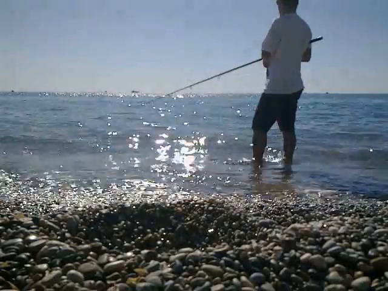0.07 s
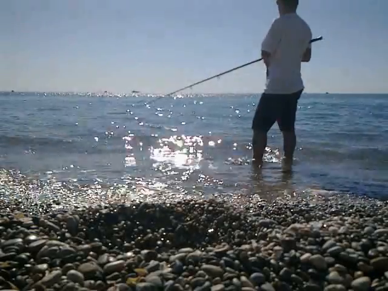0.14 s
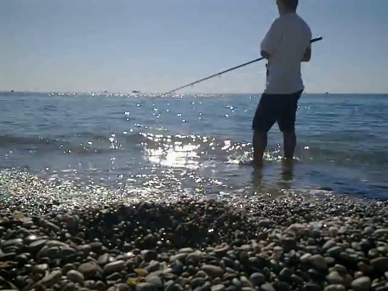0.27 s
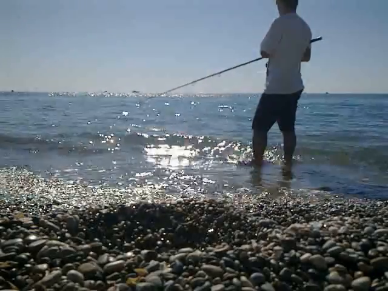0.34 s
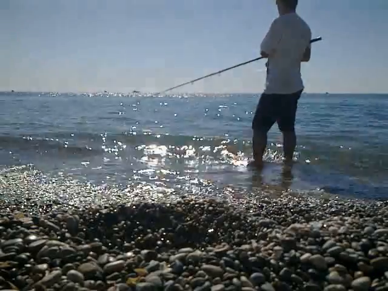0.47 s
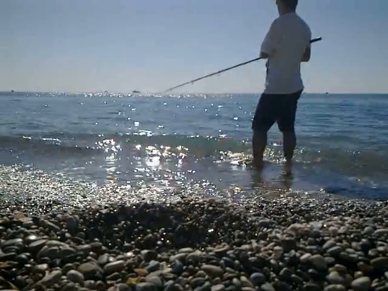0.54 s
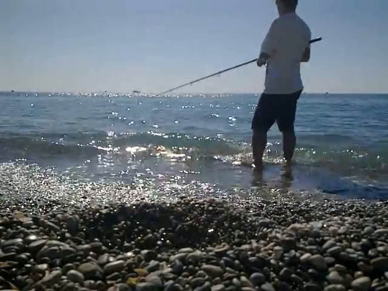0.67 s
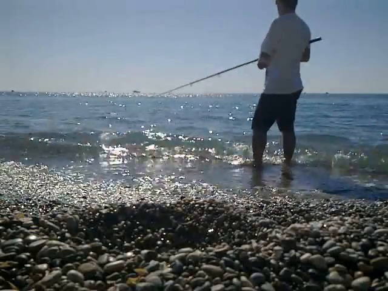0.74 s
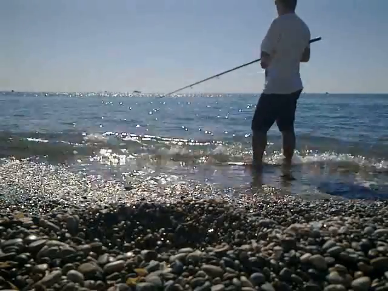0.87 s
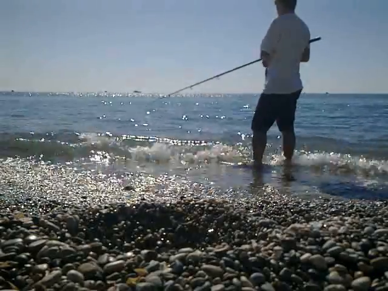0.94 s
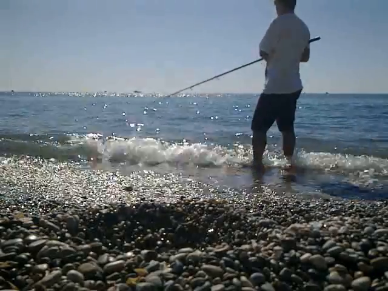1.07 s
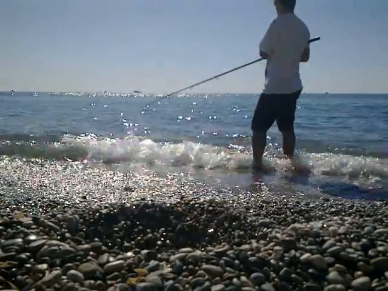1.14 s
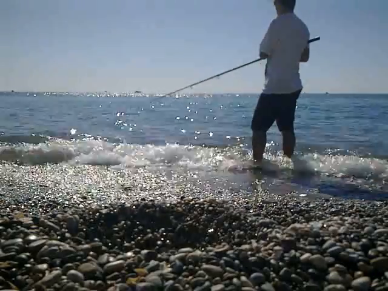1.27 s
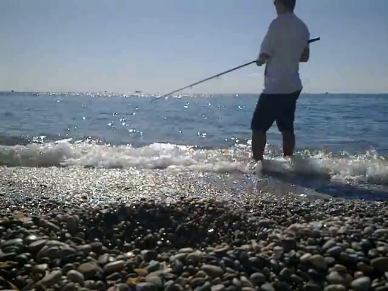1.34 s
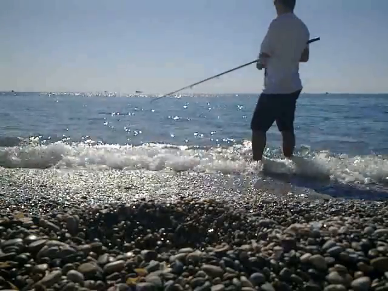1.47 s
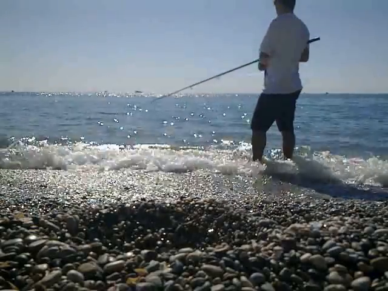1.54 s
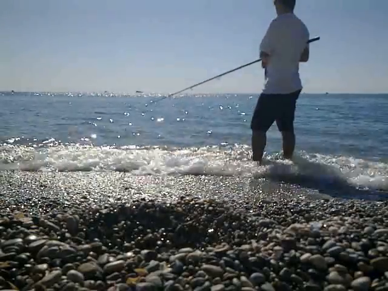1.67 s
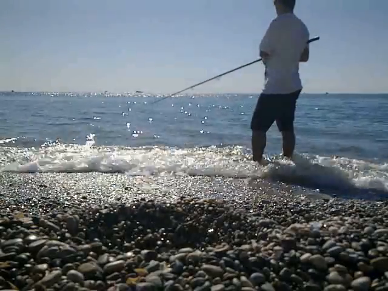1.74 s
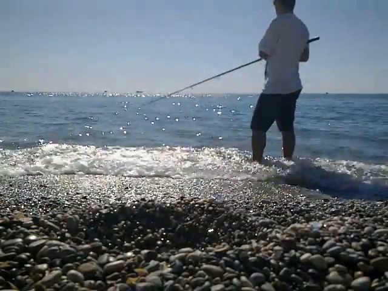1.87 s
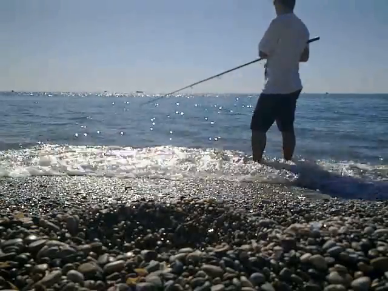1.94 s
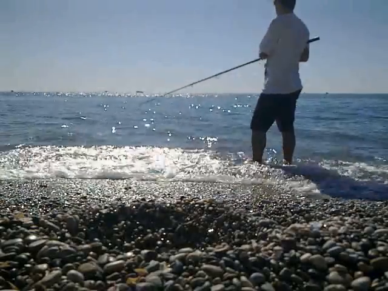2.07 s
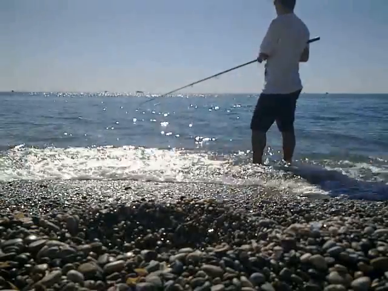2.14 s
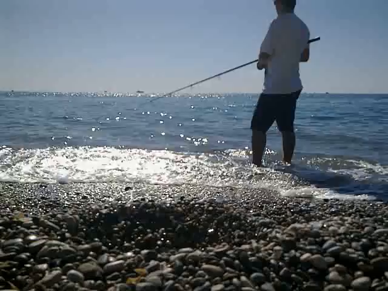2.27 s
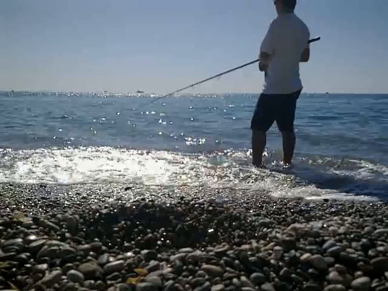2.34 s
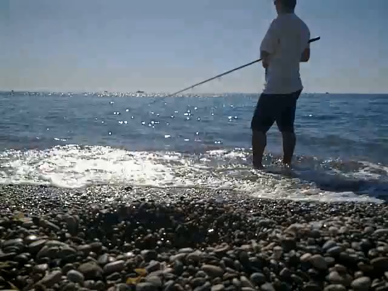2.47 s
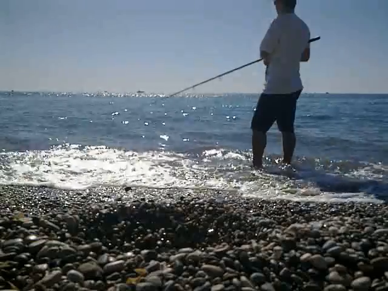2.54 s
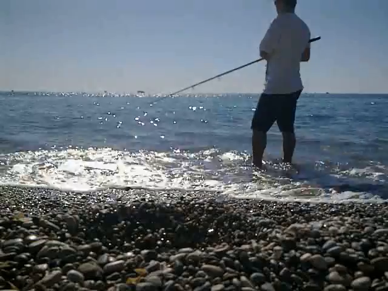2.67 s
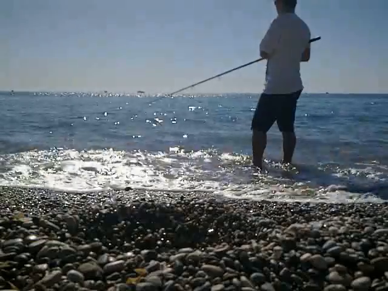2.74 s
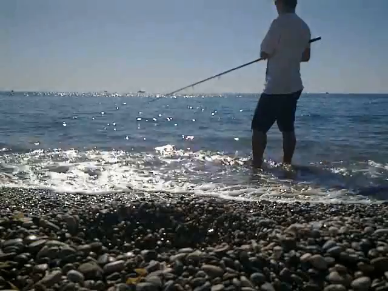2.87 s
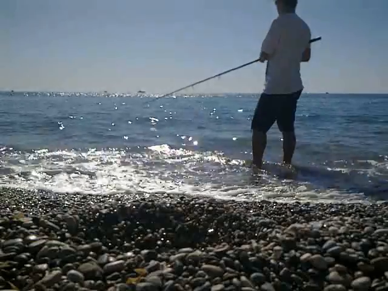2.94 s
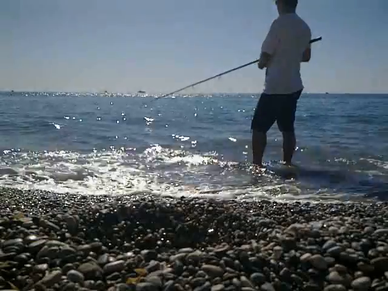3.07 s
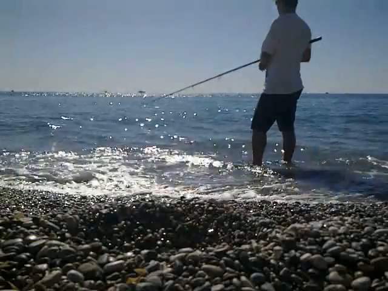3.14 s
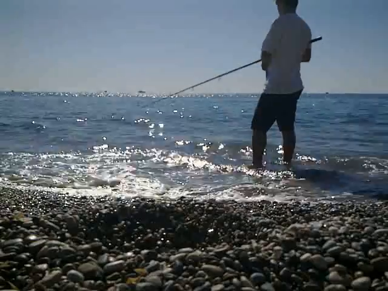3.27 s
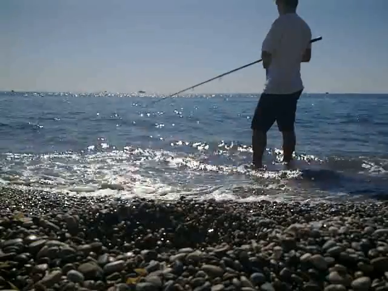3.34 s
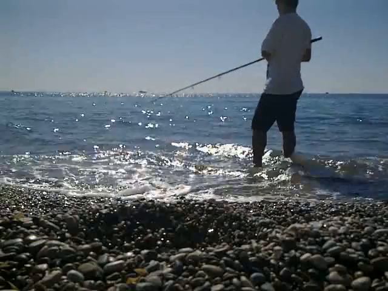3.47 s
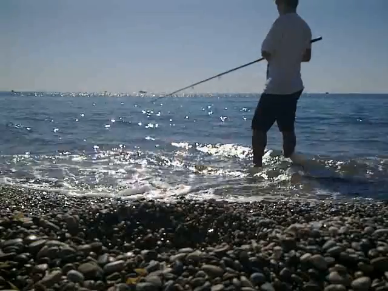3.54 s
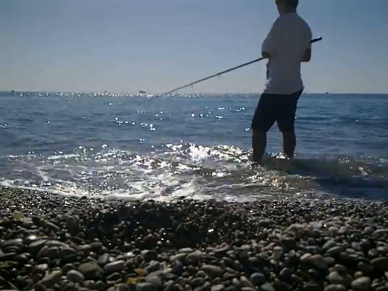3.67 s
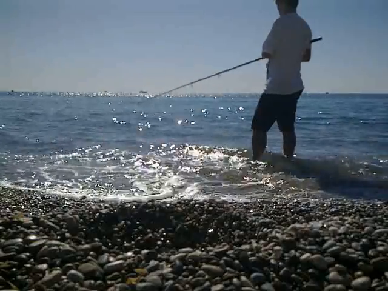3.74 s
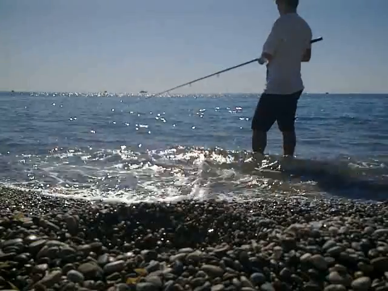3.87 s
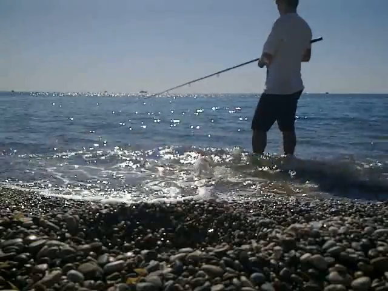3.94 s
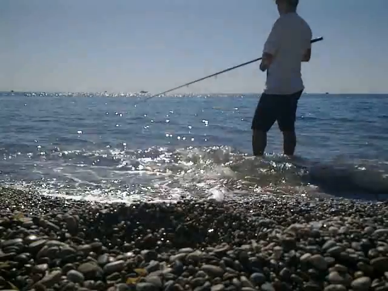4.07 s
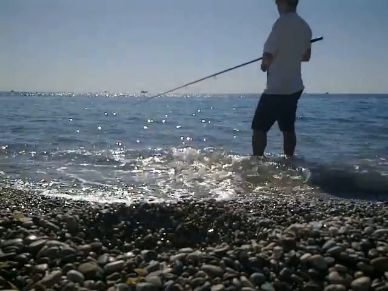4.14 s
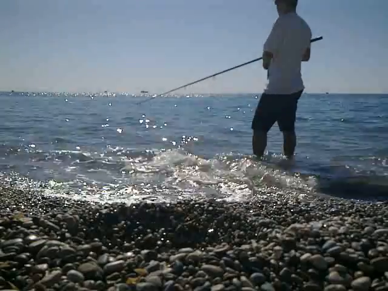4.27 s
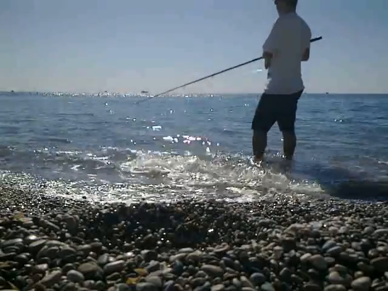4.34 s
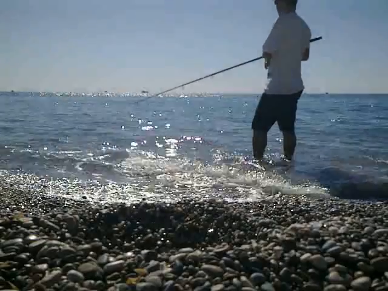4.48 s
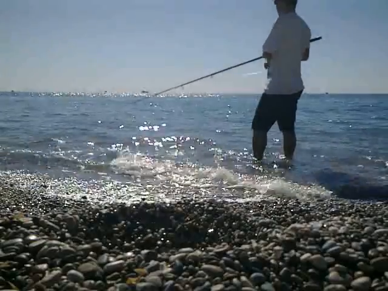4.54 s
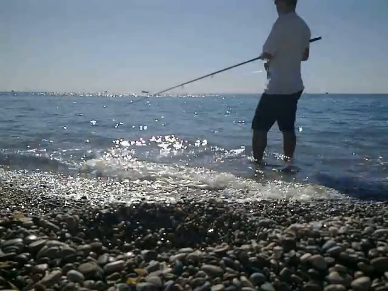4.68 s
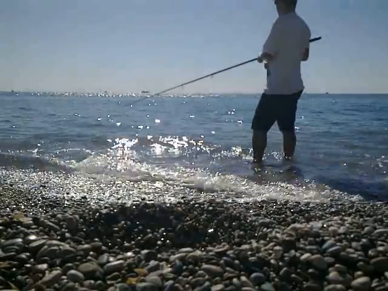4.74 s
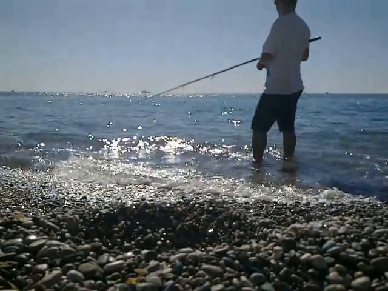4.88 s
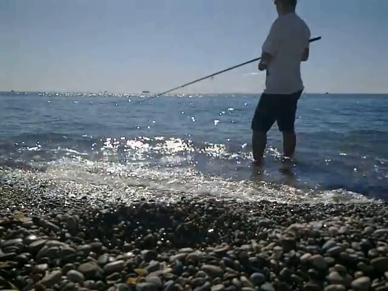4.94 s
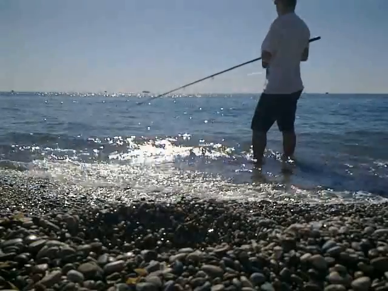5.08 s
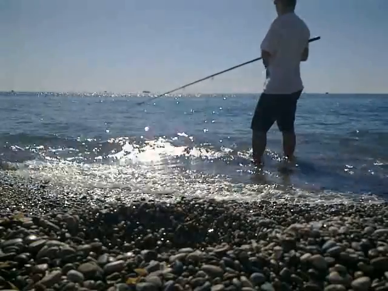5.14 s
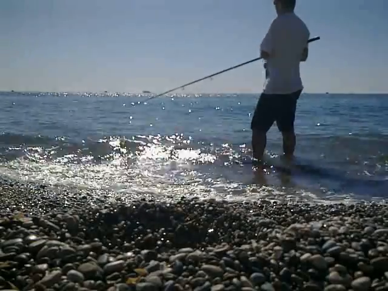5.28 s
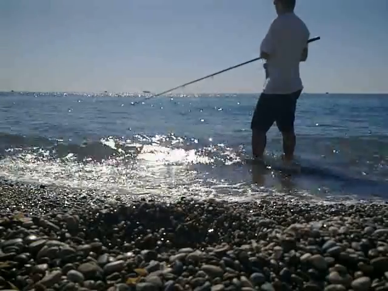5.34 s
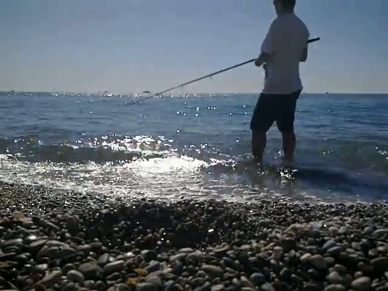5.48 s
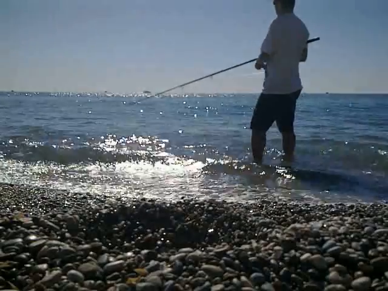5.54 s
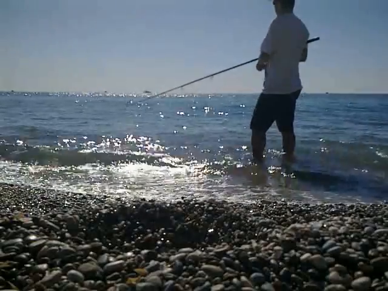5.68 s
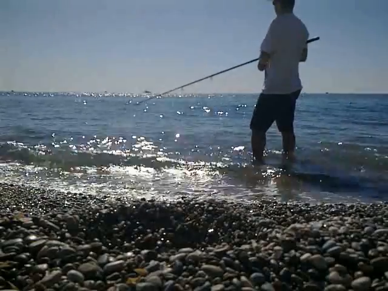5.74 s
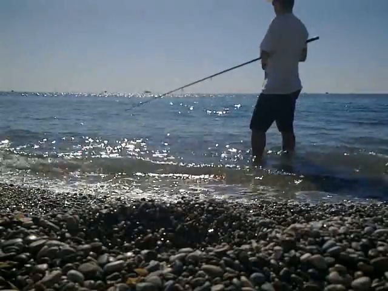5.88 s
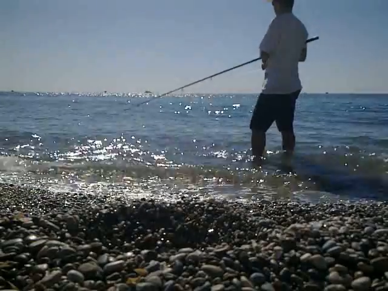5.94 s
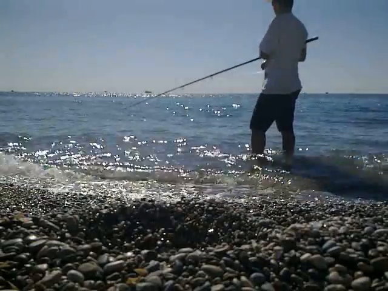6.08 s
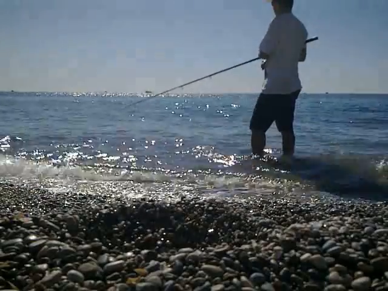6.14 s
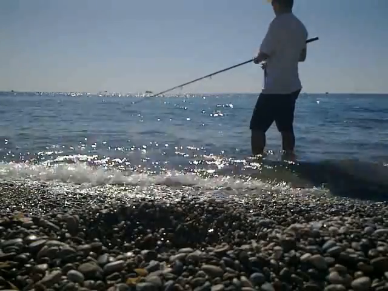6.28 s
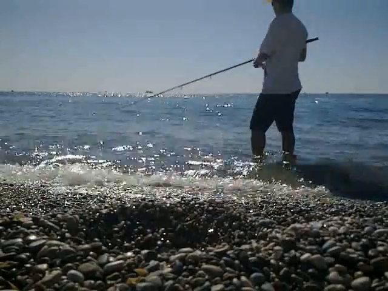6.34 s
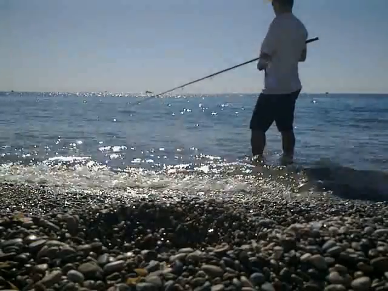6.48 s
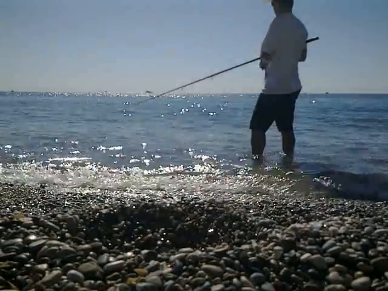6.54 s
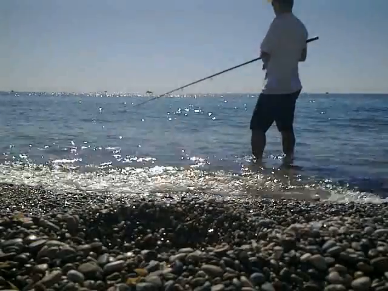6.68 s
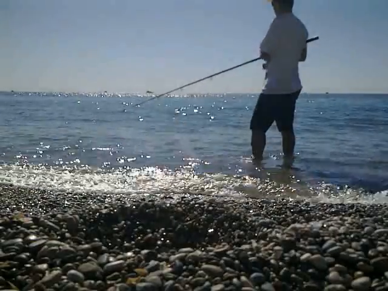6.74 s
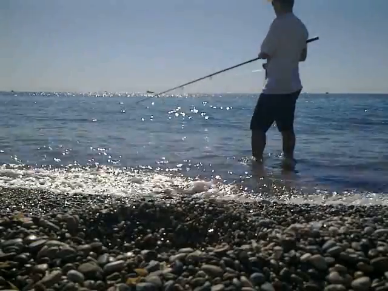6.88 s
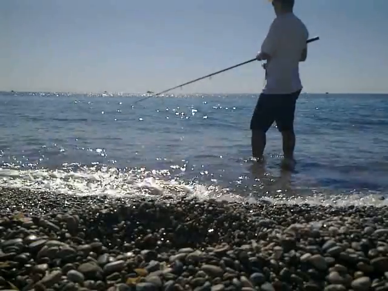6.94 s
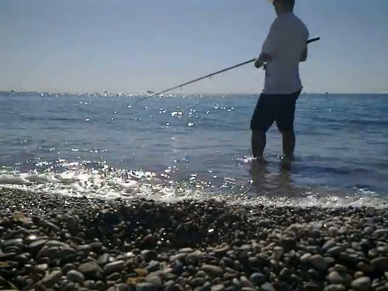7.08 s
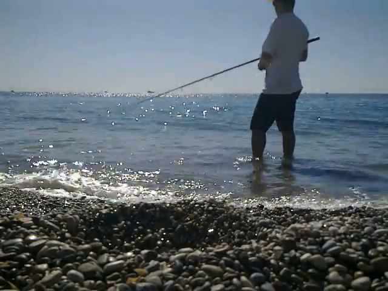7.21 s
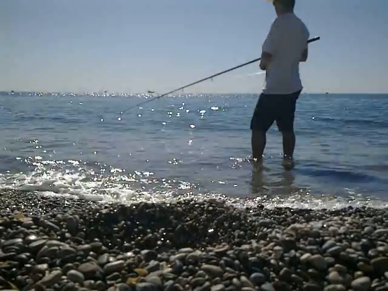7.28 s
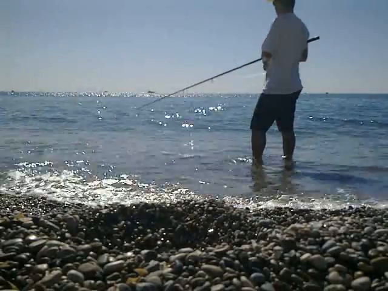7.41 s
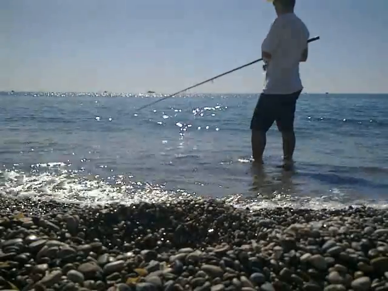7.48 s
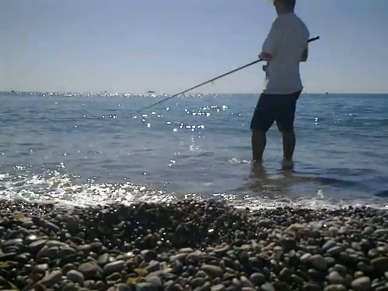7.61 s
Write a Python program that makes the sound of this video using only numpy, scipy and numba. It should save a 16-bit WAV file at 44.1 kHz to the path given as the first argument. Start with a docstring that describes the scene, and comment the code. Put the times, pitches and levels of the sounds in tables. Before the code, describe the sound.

Wind buffets the microphone as small waves splash up a pebble shore and drain, with distant surf and a boat droning faintly.

```python
"""Small waves wash up a pebble beach, a few metres from a microphone lying on the stones.
From the start, wind thumps the microphone and a far boat engine drones over distant surf.
At 1 s a wave breaks as clouds of ringing bubbles: big air pockets gulp, foam churns, spray flies.
It fizzes away through the pebbles by 3 s, lone drops fall, and a weaker wave follows near 4.5 s.
Just after 6 s another wave breaks, and it is still draining at the end."""
import sys
import numpy as np
from scipy import signal
from scipy.fft import rfft, irfft, next_fast_len
from scipy.io import wavfile
from scipy.ndimage import uniform_filter1d
from numba import njit

SR = 44100
rng = np.random.default_rng(int(sys.argv[2]) if len(sys.argv) > 2 else 0)


def generate_wav(signal):
    """Clip the signal to [-1, 1] and save it as 16-bit WAV at the path in sys.argv[1]."""
    frames = np.transpose(np.atleast_2d(signal))
    scaled = np.clip(frames, -1, 1) * 32767
    pcm = np.round(scaled).astype(np.int16)
    wavfile.write(sys.argv[1], SR, pcm)


N = 336483

# The near waves. Each row: time in seconds, then the levels in dB of churning foam,
# fizz draining through pebbles, rattle and splash.
WAVE_LEVELS = [(0, -52.5, -59, -64, -66.5), (.6, -52.5, -64, -66, -66.5), (.85, -47, -50.5, -55, -66),
               (.98, -40.5, -43.5, -48, -57), (1.03, -36, -40.5, -45.5, -50.5), (1.3, -35, -38, -44, -49.5),
               (1.55, -34, -37.5, -45, -52), (1.84, -38, -42.5, -46, -53), (2.31, -40.5, -41.5, -52, -64),
               (2.69, -46, -49.5, -57.5, -71), (3.2, -50, -59.5, -65, -77), (3.53, -47.5, -56.5, -58, -76),
               (3.82, -50, -54, -60.5, -77), (4.25, -44.5, -49.5, -53, -72), (4.5, -40.5, -46, -53, -72),
               (4.82, -43, -47.5, -55, -68), (5.0, -43, -47, -53.5, -63), (5.3, -44, -49.5, -57.5, -67),
               (5.55, -44.5, -49, -53.5, -70), (5.9, -42, -50, -52.5, -80),
               (6.22, -37.5, -43.5, -44.5, -59), (6.4, -35.5, -43.5, -45.5, -67),
               (6.54, -34, -40, -42.5, -57), (6.7, -35.5, -39, -42, -54), (6.86, -37.5, -35, -43.5, -66),
               (7.05, -41.5, -39, -46.5, -71), (7.4, -42.5, -41.5, -51.5, -70),
               (7.63, -48.5, -45.5, -52, -65)]
# Fine spray over the waves. Each row: time in seconds, level in dB.
SPRAY_LEVELS = [(0, -78), (.85, -75.5), (.97, -67), (1.02, -58), (1.17, -56), (1.3, -58), (1.6, -60),
                (2.19, -73), (2.59, -76), (3.95, -75), (4.4, -68), (4.7, -73.5), (5.14, -78), (5.84, -77),
                (6.22, -68), (6.42, -72), (6.62, -64), (6.93, -71), (7.29, -76), (7.63, -76)]
# Water thrown into the air in quick bursts. Each row: time in seconds, level in dB.
SPLASHES = [(.42, -66), (.87, -62), (.91, -62), (1.01, -48.5), (1.1, -51), (1.16, -49), (1.31, -55),
            (1.63, -51), (1.75, -53), (1.88, -58), (2.03, -62), (2.1, -63), (3.28, -68), (3.7, -72),
            (4.27, -62), (4.4, -59), (4.44, -58), (4.61, -59), (4.97, -66), (5.81, -66), (6.21, -60),
            (6.3, -59), (6.47, -55), (6.68, -55), (6.82, -63), (6.96, -64)]
# Six bubble clouds: pockets, churn, fizz, rattle, splash, spray. Each row: middle pitch in Hz, spread
# in octaves, ring length in cycles, size scatter in dB, share of smooth noise (0 to 1), gain in dB.
BUBBLE_CLOUDS = [(410, .45, 12, 3.5, .45, 0), (1000, .38, 20, 3.5, .45, 0), (1590, .13, 30, 3.5, .35, -1.0),
                 (2350, .32, 18, 4, .5, 0), (3900, .33, 14, 3, .7, -1.5), (6300, .55, 10, 3.5, .85, -1)]
# Bubbles per second in each of those clouds.
BUBBLES_PER_S = (220, 450, 700, 700, 2000, 9000)
# Big air pockets closing with a gulp. Each row: start in seconds, level in dB, pitch in Hz.
GULPS = [(0.478, -27.5, 255), (0.818, -27.5, 494), (1.02, -12.5, 280), (1.049, -14.5, 437),
         (1.286, -23, 590), (1.373, -15.5, 360), (3.662, -27, 300), (3.674, -23.5, 394),
         (3.947, -26.5, 460), (4.308, -23.5, 476), (4.659, -22.5, 476), (5.214, -22, 257),
         (5.86, -18.5, 382), (6.165, -22, 250), (6.2, -26, 355), (6.241, -29, 560), (6.324, -21, 412),
         (6.362, -23, 436), (6.404, -27, 377), (6.458, -29, 331), (6.478, -19, 538), (6.51, -14.5, 385),
         (6.528, -19.5, 236), (6.574, -19, 260), (6.654, -21, 364), (6.684, -15.5, 450), (6.795, -22, 258),
         (6.807, -16.5, 427), (6.94, -18, 490)]
# Water slaps and pebble knocks. Each row: start in seconds, level in dB, pitch in Hz.
KNOCKS = [(1.019, -16.5, 860), (1.05, -20.5, 1110), (2.857, -35, 1580), (3.833, -33, 1170),
          (4.308, -25, 1420), (4.509, -28, 900), (4.749, -31, 970), (5.239, -28, 1490), (5.862, -25.5, 910),
          (6.041, -24, 1010), (6.816, -19.5, 1150), (6.886, -22, 1490), (6.94, -21.5, 1400),
          (7.079, -22, 1500), (7.287, -25.5, 1690), (7.444, -30, 1860)]
# Lone drops. Each row: start in seconds, level in dB, pitch in Hz.
DROPS = [(0.0742, -42, 2190), (0.1146, -47, 2410), (0.1993, -43, 2440), (0.6225, -44, 2420),
         (0.8939, -32, 2580), (1.1694, -29, 2030), (3.281, -36.5, 2170), (3.3872, -33.5, 2070),
         (3.5309, -38, 1980), (3.5555, -42, 2430), (3.6047, -34.5, 2090), (3.717, -35.5, 2390),
         (3.8187, -39, 1910), (4.259, -31.5, 1980), (4.381, -39, 2370), (4.5694, -39, 1900),
         (4.5994, -32, 1950), (4.7102, -34, 1960), (5.595, -27, 1960), (5.862, -33, 2190)]
# Sharp spatters of spray. Each row: start in seconds, level in dB, pitch in Hz.
SPATTERS = [(0.8525, -37, 4530), (1.0011, -37, 4670), (1.1712, -29, 4610), (2.0043, -48, 4600),
            (2.0906, -35, 4680), (2.2104, -49, 4680), (2.4593, -49, 4630), (4.1076, -51, 5860),
            (4.3949, -38, 6460), (4.9437, -50, 4680), (5.1851, -45, 4770), (6.119, -51, 4670),
            (6.4767, -45, 4760)]
# How gulps, knocks, drops and spatters ring. Each row: length in cycles, pitch rise in octaves.
RING_SHAPES = [(5.86, 0.11), (11, 0.052), (14.4, 0.12), (7, 0)]
# Wind on the microphone. Each row: time in seconds, deep flutter in dB, sharper rumble in dB.
WIND_LEVELS = [(0.0, -41, -41.5), (0.45, -48, -42), (1.72, -47, -39.5), (2.02, -37.5, -39),
               (2.63, -47, -41.5), (3.02, -40.5, -40), (3.49, -37.5, -42), (4.44, -42.5, -43),
               (4.72, -33, -42), (5.1, -47, -37.5), (5.63, -34, -40.5), (6.12, -45, -41), (7.2, -43, -40.5),
               (7.63, -52, -39)]
# Hard thumps of wind. Each row: time of the pressure dip in seconds, depth in dB, width in milliseconds.
WIND_THUMPS = [(.053, -33, 7.9), (.196, -27, 6), (.25, -32, 7), (1.38, -39, 6), (1.861, -25.5, 11),
               (1.972, -28, 11), (2.077, -26, 10), (2.33, -30, 8.8), (2.395, -20, 7.2), (2.53, -28.5, 10),
               (2.932, -30, 12), (2.985, -31, 8.6), (3.065, -25, 8.7), (3.187, -24.5, 8), (3.36, -38, 12),
               (3.44, -28, 7.6), (3.505, -23, 9), (3.893, -29, 7), (4.512, -26, 10), (4.639, -26, 8.6),
               (4.801, -22, 8), (4.838, -27, 15), (4.964, -19, 7), (5.115, -13, 5.5), (5.143, -25, 8.7),
               (5.309, -20.5, 12), (5.406, -20.5, 7.9), (5.465, -24, 9), (5.561, -35, 16), (5.66, -25, 18),
               (5.777, -29, 13), (5.877, -26.5, 12), (6.079, -26, 7.7), (6.334, -24, 7.9),
               (6.746, -28.5, 24), (6.916, -24, 10), (7.146, -30.5, 16), (7.313, -25, 8.6),
               (7.564, -26.5, 11)]
# The boat engine's tones. Each row: multiple of the firing rate, typical level in dB.
ENGINE_TONES = [(1, -50), (2, -45), (3, -48.5), (4, -56.5), (5, -57), (7, -50)]
# The tone colour of the distant surf. Each row: frequency in Hz, relative level in dB.
SURF_COLOUR = [(59, -14), (100, -18), (244, -18), (380, -34.5), (444, -1), (484, 11.5), (1050, 18),
               (2180, -26), (4480, -70), (6000, -49), (7800, -79), (13200, -120)]

SIZE_LIMIT = .96  # clouds leave out the biggest 4 % of bubble sizes
POCKETS_DB, POCKETS_PER_FIZZ = -1, -0.37  # level against the churn; dB added per dB of fizz above it
SPLASH_RISE_S, SPLASH_FALL_S, SPLASH_SPRAY_DB = 0.0048, 0.011, -6  # the spray is set against its splash
SWARM_DB, SWARM_FALL_S = -18.5, 0.022  # smaller pockets trailing each gulp: level against it, fade time
GUST_DB, GUSTS_PER_S = 4, 12
REBOUND, REBOUND_DELAY, REBOUND_WIDTH = 0.47, 1.45, 1.9  # share of a dip's depth; the others in dip widths
ENGINE_HZ, ENGINE_WOBBLE = 34.78, 0.019  # firing rate, and the share by which it wanders
SURF_DB, HISS_DB, TOP_HZ = -51.5, -74.5, 15660


def near_waves():
    """Six bubble clouds surge together; single gulps, knocks, drops and spatters stand out."""
    surge_db = 0.41 * wander(30)
    clouds = zip(cloud_levels(), BUBBLES_PER_S, BUBBLE_CLOUDS)
    wash = sum(undb(db + surge_db) * bubble_cloud(per_s, *row) for db, per_s, row in clouds)
    kinds = zip((GULPS, KNOCKS, DROPS, SPATTERS), RING_SHAPES)
    events = [row + shape for table, shape in kinds for row in table]
    singles = bubbles(*np.transpose(events))
    return wash + band(248, 16000, singles)  # pockets this small make no deep sound


def cloud_levels():
    """Each cloud's level in dB: gulps stir up more pockets, and thrown water adds splash and spray."""
    churn, fizz, rattle, splash = curves(WAVE_LEVELS)
    spray, = curves(SPRAY_LEVELS)
    thrown = bursts(SPLASHES, SPLASH_RISE_S, SPLASH_FALL_S)
    swarms = bursts(GULPS, SPLASH_RISE_S, SWARM_FALL_S)
    pockets = POCKETS_DB + churn + POCKETS_PER_FIZZ * (fizz - churn)  # weaker as draining takes over
    pockets = add_power(pockets, swarms, SWARM_DB)
    splash = add_power(splash, thrown, 0)
    spray = add_power(spray, thrown, SPLASH_SPRAY_DB)
    return pockets, churn, fizz, rattle, splash, spray


def bubble_cloud(per_s, hz, octaves, cycles, scatter_db, smooth, gain_db):
    """Many random bubbles ring over a blur of noise: the ones too many to tell apart."""
    count = int(per_s * N / SR)
    when, size, life = rng.random((count, 3)).T
    pitch = np.clip(hz * 2 ** (octaves * rng.standard_normal(count)), 100, .4 * SR)
    level_db = -scatter_db * np.log(1 - SIZE_LIMIT * size)
    pops = bubbles(when * N / SR, level_db, pitch, cycles * (.5 + life), glide=0.265 * life)
    low_hz, high_hz = hz * 2 ** -(1.12 * octaves), hz * 2 ** (1.325 * octaves)
    blur = band_noise(low_hz, high_hz)
    pops = unit(band(low_hz / 1.98, high_hz * 2.05, pops))
    mix = np.sqrt(smooth) * blur + np.sqrt(1 - smooth) * pops
    return undb(gain_db + 0.13 * wander(40)) * mix


def bubbles(start_s, level_db, hz, cycles, glide):
    """Trapped air rings like a tiny bell, once for each start time."""
    start = (np.asarray(start_s) * SR).astype(np.int64)
    return ring(start, hz, undb(level_db), np.maximum(cycles, 1.), glide)


@njit
def ring(start, hz, size, cycles, glide):
    """Each bubble is a pure tone that swells for half a cycle and dies away as its pitch glides up."""
    out = np.zeros(N)
    for k in range(len(start)):
        life = cycles[k] / np.pi / hz[k] * SR  # samples to fade to 37 %
        step = np.exp(2j * np.pi * hz[k] / SR - 1 / life)  # turns and shrinks the tone each sample
        climb = np.exp(2j * np.pi * hz[k] / SR * (2 ** glide[k] - 1) / (2 * life))
        tone = size[k] + 0j
        for i in range(start[k], min(N, start[k] + int(5 * life))):
            swell = min(1., 2 * (i - start[k]) * hz[k] / SR)
            out[i] += tone.imag * swell
            tone *= step
            step *= climb
    return out


def bursts(events, rise_s, fall_s):
    """The power of stirred water swells up to each event and fades after it."""
    time_s, level_db = np.transpose(events)[:2]
    kicks = np.bincount((time_s * SR).astype(int), undb(level_db) ** 2, N)
    fade = lambda x, fade_s: signal.lfilter([1], [1, -np.exp(-1 / fade_s / SR)], x)
    return fade(kicks, fall_s) + fade(kicks[::-1], rise_s)[::-1]


def wind():
    """Swirls of air press on the microphone: a deep gusty flutter, a sharper rumble and single thumps."""
    flutter_db, rumble_db = curves(WIND_LEVELS)
    flutter = band_noise(15, 57) * undb(flutter_db + GUST_DB * wander(GUSTS_PER_S))
    rumble = band_noise(39, 165.5) * undb(rumble_db + 2.24 * wander(18))
    return flutter + rumble + wind_thumps()


def wind_thumps():
    """In each thump the air pressure dips quickly, then rebounds more slowly."""
    out = np.zeros(N)
    hump = lambda x: np.exp(-4 * np.log(2) * x ** 2)  # 1 wide at half its height
    for time_s, depth_db, width_ms in WIND_THUMPS:
        span = np.arange(int((time_s - .05) * SR), min(int((time_s + .12) * SR), N))
        offset = (span / SR - time_s) / (width_ms / 1000)
        rebound = REBOUND * hump((offset - REBOUND_DELAY) / REBOUND_WIDTH)
        out[span] += undb(depth_db) * (rebound - hump(offset))
    return out


def boat_engine():
    """An engine fires unevenly; each of its tones fades in and out on the long way over the water."""
    firing_hz = ENGINE_HZ * (1 + ENGINE_WOBBLE * wander(12))
    phase = 2 * np.pi * np.cumsum(firing_hz) / SR
    return sum(undb(db + 2.54 * wander(9)) * np.sqrt(2) * np.sin(multiple * phase)
               for multiple, db in ENGINE_TONES)


def distant_surf():
    """Waves on the far shore blend into one steady, soft rush."""
    hz, db = np.transpose(SURF_COLOUR)
    size = next_fast_len(N)
    all_hz = np.arange(size // 2 + 1) * SR / size
    gain = undb(np.interp(np.log(all_hz + 1), np.log(hz), db))
    rush = irfft(rfft(rng.standard_normal(size)) * gain, size)[:N]
    return undb(SURF_DB) * unit(rush)


def undb(db):
    """Turn decibels into a plain multiplier."""
    return 10 ** (np.asarray(db) / 20)


def add_power(level_db, power, gain_db):
    """Add a power, scaled by gain_db, to a level; the result is in dB."""
    return 10 * np.log10(undb(level_db) ** 2 + undb(gain_db) ** 2 * power)


def unit(x):
    """Scale a signal so its average power is 1."""
    return x / np.sqrt(np.mean(x ** 2))


def curves(table):
    """Join a table's rows with straight lines: one curve for each column after the time."""
    time_s, *columns = np.transpose(table)
    return [np.interp(np.arange(N) / SR, time_s, column) for column in columns]


def band(low_hz, high_hz, x):
    """Keep mostly the sound between two frequencies."""
    edges_hz = [low_hz, min(high_hz, .45 * SR)]
    return signal.sosfilt(signal.butter(2, edges_hz, "band", fs=SR, output="sos"), x)


def band_noise(low_hz, high_hz):
    """Noise between two frequencies, with average power 1."""
    return unit(band(low_hz, high_hz, rng.standard_normal(N)))


def wander(per_s):
    """A smooth random wobble, about 1 in size, that heads for a new value per_s times a second."""
    hold = int(SR / per_s)
    steps = np.repeat(rng.standard_normal(N // hold + 1), hold)
    smooth = uniform_filter1d(uniform_filter1d(steps, hold), hold)[:N]
    drift = uniform_filter1d(smooth, 4 * hold)
    return unit(smooth - drift)


def scene():
    """One microphone hears it all."""
    return (near_waves() + wind() + boat_engine() + distant_surf())[None, :]


def record(dry):
    """The microphone adds its own faint hiss, and the highest treble is cut off steeply."""
    hissing = dry + undb(HISS_DB) * rng.standard_normal(N)
    return signal.sosfilt(signal.ellip(10, .2, 80, TOP_HZ, fs=SR, output="sos"), hissing)


dry = scene()
out = record(dry)
generate_wav(out)
```